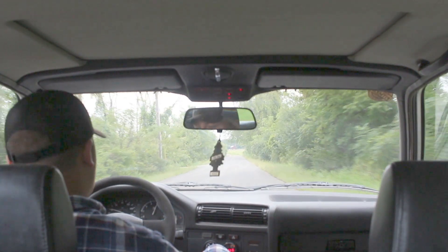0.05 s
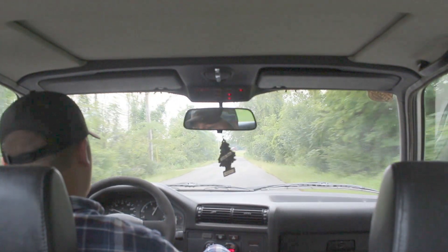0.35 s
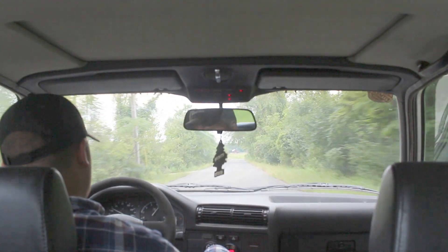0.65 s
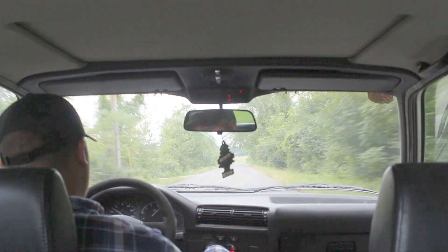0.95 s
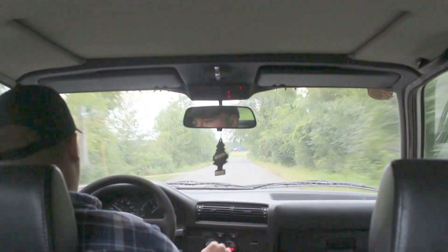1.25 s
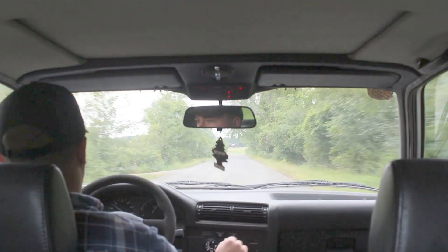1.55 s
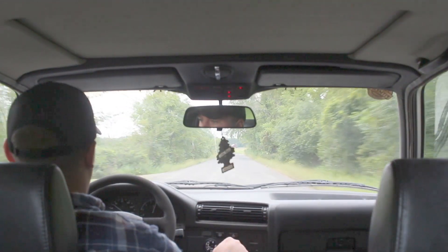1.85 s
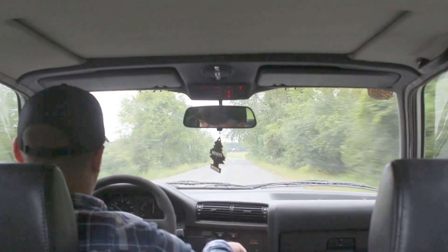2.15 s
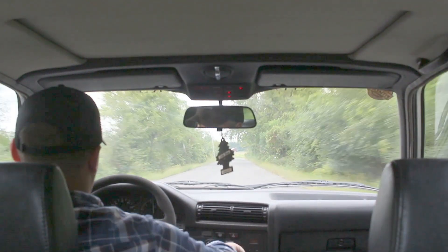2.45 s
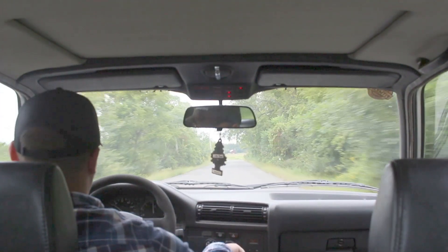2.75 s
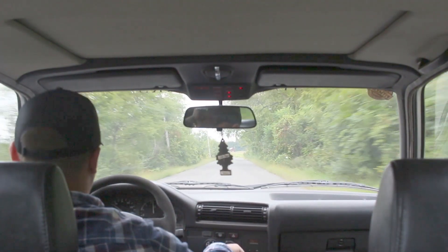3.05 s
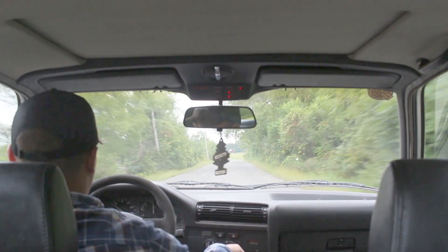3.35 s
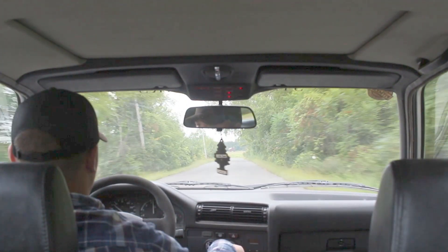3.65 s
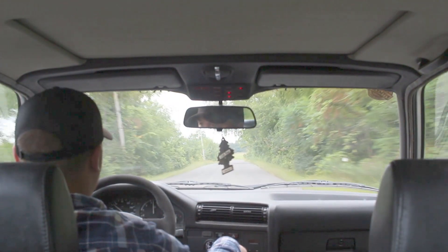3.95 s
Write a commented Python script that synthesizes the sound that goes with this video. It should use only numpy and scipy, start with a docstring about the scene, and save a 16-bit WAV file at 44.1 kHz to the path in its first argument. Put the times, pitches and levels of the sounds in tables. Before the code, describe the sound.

A turbocharged car engine pulls upward in pitch for the first second, with a faint rising whistle, heard from the back seat over tyre rumble. At about 1.2 seconds the throttle lifts: the revs fall, the exhaust burbles and the turbo flutters in rapid airy chuffs until 2.4. Dull gear change knocks land around 1.3 and 1.8. From 2.3 the engine drones lower and steadily to the end at 4.

```python
"""Inside a turbocharged six-cylinder car on a country road. Over the broadband rumble of the tyres,
periodic firing sounds a harmonic series that climbs as the engine pulls and the turbo whistles up.
The throttle lifts for a gear change: trapped boost surges back through the compressor in chuffs,
the drivetrain knocks, and uneven firings ring the exhaust. Then the engine drones on in the next gear."""
import sys
import numpy as np
from scipy import signal
from scipy.fft import rfft, irfft
from scipy.io import wavfile
from scipy.ndimage import uniform_filter1d

SR = 44100
rng = np.random.default_rng(int(sys.argv[2]) if len(sys.argv) > 2 else 0)


def int16_out(signal):
    """Quantize to a 16-bit WAV file."""
    q = np.round(np.clip(np.atleast_2d(signal).T, -1, 1) * 32767)
    wavfile.write(sys.argv[1], SR, q.astype(np.int16))


N = 176400
T = np.arange(N) / SR


def amp(db):
    """The decibel scale: level to amplitude ratio."""
    return 10 ** (np.asarray(db) / 20)


def unit(x):
    """Normalisation to rms 1."""
    return x / np.sqrt(np.mean(x ** 2) + 1e-20)


def curve(points):
    """Linear interpolation of (time [s], value) points."""
    return np.interp(T, *np.transpose(points))


def swell(at_s, width_s):
    """A Gaussian envelope of peak 1."""
    return np.exp(-((T - at_s) / width_s) ** 2)


def drift(hz):
    """Random modulation: noise of rms 1, low-passed at hz."""
    f = np.fft.rfftfreq(N, 1 / SR)
    return unit(irfft(rfft(rng.standard_normal(N)) / (1 + (f / hz) ** 4), N))


def noise(spectrum, tilt=lambda f: 1):
    """Spectral shaping: noise of rms 1 from (frequency [Hz], relative level [dB]) points."""
    f = np.fft.rfftfreq(N, 1 / SR) + 1
    hz, db = np.transpose(spectrum)
    gain = amp(np.interp(np.log(f), np.log(hz), db)) * tilt(f)
    return unit(irfft(rfft(rng.standard_normal(N)) * gain, N))


def resonate(x, hz, half_width_hz):
    """Resonance: a double pole follows hz, 6 dB down at half_width_hz to either side; rms 1."""
    carrier = np.exp(2j * np.pi * np.cumsum(hz * np.ones(N)) / SR)
    pole = np.exp(-2 * np.pi * half_width_hz / SR)
    return unit((carrier * signal.lfilter([1], [1, -2 * pole, pole * pole], x / carrier)).real)


def noise_band(hz, half_width_hz):
    """Random excitation of a resonance gives a fuzzy tone of rms 1."""
    return resonate(rng.standard_normal(N), hz, half_width_hz)


# tyres, wind and running gear (frequency [Hz], relative level [dB])
ROAD_SPECTRUM = [(15, -24), (31, -1), (45, -9.5), (70, 3.5), (120, 1), (200, 1.5), (290, -4), (380, -4.5),
                 (470, -13.5), (580, -16), (760, -13.5), (1000, -20), (1300, -26), (1650, -27.5),
                 (2300, -35.5), (3100, -35.5), (4000, -37.5), (4500, -43.5), (5600, -49), (6700, -52.5),
                 (7500, -57), (10000, -63.5), (16000, -72.5)]
# road noise below the crossover (time [s], level [dB])
RUMBLE_LEVEL = [(0, -24.5), (.75, -29.5), (1.1, -19), (1.32, -18), (1.5, -19), (1.95, -21), (2.3, -19.5),
                (3.3, -20.5), (4, -23.5)]
# road noise above the crossover (time [s], level [dB])
HISS_LEVEL = [(0, -40.5), (.2, -37.5), (1, -38.5), (1.6, -35), (1.9, -39.5), (2.3, -35), (2.8, -37),
              (3.1, -34.5), (3.38, -33), (3.65, -37), (4, -39)]
# modes of the engine bay and body (frequency [Hz], half-width [Hz], relative level [dB])
BODY_MODES = [(3635, 55, -61), (3800, 250, -64), (3948, 38, -62.5), (4830, 160, -71)]

def road(crossover_hz=483, lumps_db=1, flicker_db=.57, intake_coupling_db=41.5):
    """Broadband noise and forced vibration: tyres rumble and hiss; hiss and intake air ring the body."""
    rumble = noise(ROAD_SPECTRUM, lambda f: 1 / np.sqrt(1 + (f / crossover_hz) ** 8))
    hiss = noise(ROAD_SPECTRUM, lambda f: 1 / np.sqrt(1 + (crossover_hz / f) ** 8))
    hiss_gain = amp(curve(HISS_LEVEL) + flicker_db * drift(39))
    modes = sum(amp(db) * noise_band(hz, half_width) for hz, half_width, db in BODY_MODES)
    drive = np.hypot(unit(hiss_gain), amp(curve(INTAKE_LEVEL) + intake_coupling_db))  # powers add
    rumble_gain = amp(curve(RUMBLE_LEVEL) + lumps_db * drift(6.8))
    return rumble_gain * rumble + hiss_gain * hiss + drive * modes


def gearbox(firing_multiple=29.3, level_db=-69.5, waver_db=2, fade_in_s=(1.8, 3.1)):
    """Order tracking: a thin whine follows engine speed in the next gear; a faint peep sounds once."""
    whine_gain = amp(level_db + waver_db * drift(4.4)) * np.interp(T, fade_in_s, [0, 1])
    whine = whine_gain * noise_band(firing_multiple * curve(FIRING_RATE), half_width_hz=70)
    peep = amp(level_db) * swell(at_s=2.81, width_s=.12) * noise_band(hz=6600, half_width_hz=220)
    return whine + peep


# drivetrain knocks and exhaust pops (time [s], envelope peak [dB], frequency [Hz])
THUMP_EVENTS = [(1.147, -13, 206), (1.179, -10.5, 374), (1.307, -5.5, 100), (1.34, -6.5, 205),
                (1.799, -4.5, 204.1), (1.963, -15.5, 242)]
# light rattles of the trim (time [s], level [dB])
TRIM_HITS = [(.137, -57), (.162, -57), (.34, -60), (0.444, -54)]
# dull clunks of the gear lever (time [s], level [dB])
LEVER_HITS = [(1.184, -27), (1.815, -30)]
# spectra of the trim and the lever (frequency [Hz], relative level [dB])
TRIM_SPECTRUM = [(1000, 3), (3500, -0.5), (6700, 1), (9000, -15), (16000, -24)]
LEVER_SPECTRUM = [(300, -12), (780, 3), (1100, -12), (1600, -14), (3000, -32), (16000, -80)]

def knocks(thump_s=.003):
    """Damped transients: thumps decay as sinusoids, trim rattles and lever clunks as noise."""
    rattle, clunk = noise(TRIM_SPECTRUM), noise(LEVER_SPECTRUM)
    out = np.zeros(N)
    for s, db, hz in THUMP_EVENTS:
        age = np.maximum(T - s, 0)
        out += amp(db) * age / thump_s * np.exp(1 - age / thump_s) * np.sin(2 * np.pi * hz * age)
    out += rattle * impacts(TRIM_HITS, rise_s=.001, decay_s=.018)
    return out + clunk * impacts(LEVER_HITS, rise_s=.008, decay_s=.022)


def impacts(hits, rise_s, decay_s):
    """Exponential decay after a linear rise: the envelope of a series of hits."""
    return sum(amp(db) * np.clip((T - s) / rise_s, 0, 1) * np.exp(-abs(T - s) / decay_s)
               for s, db in hits)


def cabin(x, decay_s=.008, echo_gain=.42):
    """Interference: dense early reflections off glass and trim give the treble a hollow colour."""
    t = T[:SR // 10]
    echoes = rng.standard_normal(len(t)) * np.exp(-t / decay_s)
    echoes = signal.sosfilt(signal.butter(2, 1000, "high", fs=SR, output="sos"), echoes)
    reflected = signal.fftconvolve(x, echoes / np.linalg.norm(echoes))[:N]
    return (x + echo_gain * reflected) / np.hypot(1, echo_gain)


# pulses of back flow through the compressor (time [s], level [dB])
SURGE_PULSES = [(1.217, -54), (1.285, -44.5), (1.355, -47.5), (1.428, -49), (1.494, -50), (1.563, -47.5),
                (1.631, -50), (1.699, -51), (1.764, -48.5), (1.827, -53), (1.887, -50), (1.945, -50.5),
                (2.006, -50), (2.065, -52), (2.126, -50), (2.19, -50.5), (2.248, -50.5), (2.314, -57),
                (2.375, -67)]

def surge(rise_s=.015, fall_s=.022, shrink_per_s=.25):
    """Compressor surge: the envelope of the back flow, whose pulses shorten as the boost drains."""
    stretch = np.exp(-shrink_per_s * (T - SURGE_PULSES[0][0]))
    return sum(amp(db) * swell(s, stretch * np.where(T < s, rise_s, fall_s)) for s, db in SURGE_PULSES)


# spectra of every chuff and of the bright spit (frequency [Hz], relative level [dB])
CHUFF_SPECTRUM = [(500, -18), (1500, -5), (3700, 19), (5500, 7.5), (7200, -6.5), (8400, -4), (9500, -5.5),
                  (12000, -3), (14300, -10), (15200, -20)]
SPIT_SPECTRUM = [(5000, -29), (9000, -4), (11000, 2), (14200, 4), (15000, -2)]

def flutter(grain_db=2.5, spit_fade_s=(1.5, 1.9), chirp_growth_s=(1, 2.2)):
    """Pulsed flow noise: trapped boost escapes in chuffs; the first ones spit, the last ones chirp."""
    spit = amp(-14) * np.interp(T, spit_fade_s, [1, 0]) * noise(SPIT_SPECTRUM)
    chirp = amp(-16) * np.interp(T, chirp_growth_s, [0, 1]) * noise_band(hz=8400, half_width_hz=400)
    return surge() * amp(grain_db * drift(300)) * (noise(CHUFF_SPECTRUM) + spit + chirp)


# compressor whistle (time [s], frequency [Hz], level [dB])
WHISTLE_PATH = [(0, 5180, -70), (0.2, 5620, -68), (.4, 6430, -68), (.6, 7400, -69), (.8, 8700, -67),
                (1, 9500, -66), (1.17, 9750, -66.5), (1.3, 9150, -65), (1.5, 8090, -66), (1.72, 7050, -75),
                (1.95, 6200, -73), (2.15, 5630, -67), (2.4, 5050, -66.5), (2.8, 4400, -71.5),
                (3.08, 3980, -63), (3.5, 3720, -62.5), (4, 3490, -72)]
# air rushing through the intake (time [s], level [dB])
INTAKE_LEVEL = [(0, -59), (.6, -48.5), (.85, -47), (1.05, -40.5), (1.22, -37), (1.4, -41.5), (1.58, -42.5),
                (1.75, -46), (1.95, -50), (4, -64.5)]
# spectrum of that air (frequency [Hz], relative level [dB])
INTAKE_SPECTRUM = [(100, -20), (400, 2.5), (750, 1), (1100, 0), (1600, -9.5), (2400, -12), (3700, -10.5),
                   (5000, -17.5), (7400, -24.5), (9500, -29), (14000, -39.5), (16000, -43)]

def turbo(flicker_db=1, waver_db=3.5, chop_db=6):
    """Aerodynamic sound: the compressor's whistle, chopped by surge, and the rush of the air it draws."""
    times, hz, db = np.transpose(WHISTLE_PATH)
    pitch = np.interp(T, times, hz)
    backflow = surge()
    mean_flow = uniform_filter1d(backflow, size=3000)
    chop = (backflow - mean_flow) / (mean_flow + amp(-66))
    whistle_db = np.interp(T, times, db) - waver_db * drift(25) + chop_db * chop
    whistle = amp(whistle_db) * noise_band(pitch, half_width_hz=135)
    halo = amp(-29) * noise_band(pitch, half_width_hz=900)  # an airy band around the whistle
    intake_gain = amp(curve(INTAKE_LEVEL) + flicker_db * drift(60))
    return whistle + intake_gain * (noise(INTAKE_SPECTRUM) + halo)


# hoarse rasp of the engine (frequency [Hz], relative level [dB])
RASP_SPECTRUM = [(500, -9), (1000, -5), (1600, 6.5), (2100, -5), (2800, -7), (5000, -21.5), (16000, -38.5)]

def rasp(level_db=-43, depth=.63):
    """Amplitude modulation: noise puffs once per firing and swells near the top of the revs."""
    puffs = 1 + depth * np.cos(2 * np.pi * np.cumsum(curve(FIRING_RATE)) / SR)
    return amp(level_db) * swell(at_s=.988, width_s=.23) * puffs * noise(RASP_SPECTRUM)


# resonances of the exhaust (frequency [Hz], level [dB])
EXHAUST_MODES = [(380, -27.5), (503, -37.5), (632, -35), (757, -33.5)]

def bark():
    """Modal resonance: the exhaust rings roughly for a moment as the throttle shuts."""
    modes = sum(amp(db) * noise_band(hz, half_width_hz=25) for hz, db in EXHAUST_MODES)
    return swell(at_s=1.2, width_s=.1) * modes


# rough exhaust note, loudest off the throttle (time [s], level [dB])
BURBLE_LEVEL = [(0, -56), (.9, -39.5), (1.15, -43), (1.35, -25.5), (1.65, -18), (1.9, -30.5), (2.15, -27.5),
                (2.4, -23), (4, -42)]

def burble(spread_db=3.5):
    """Impulse excitation: firings of uneven strength and random sign ring the exhaust."""
    firings = np.diff(np.floor(np.cumsum(curve(FIRING_RATE)) / SR), prepend=0)
    strengths = amp(spread_db * np.clip(rng.standard_normal(N), -2, 2))
    signs = np.sign(rng.standard_normal(N))
    return amp(curve(BURBLE_LEVEL)) * resonate(firings * strengths * signs, hz=230, half_width_hz=75.5)


# engine speed (time [s], firing rate [Hz])
FIRING_RATE = [(0, 200.5), (.25, 214.1), (.5, 225.5), (.75, 236), (1, 248.7), (1.1, 252.2), (1.29, 250.8),
               (1.5, 229), (1.75, 203.9), (2, 183.3), (2.2, 164.7), (2.5, 166.1), (3, 167.6), (3.5, 169.8),
               (4, 170.5)]
# boom of the firing note in the cabin (time [s], level [dB])
BOOM_LEVEL = [(0, -13.5), (.35, -15.5), (.52, -13), (.8, -16), (.95, -21.5), (1.08, -35), (1.25, -23.5),
              (1.38, -17), (1.46, -21), (1.62, -14.5), (1.85, -21), (2.16, -30), (2.26, -14.5), (2.8, -17),
              (3.3, -16.5), (3.8, -13), (4, -13.5)]
# engine load, added to the level of every order (time [s], gain [dB])
LOAD_GAIN = [(0, -5.5), (.5, -2), (1, 2), (1.08, -3.5), (1.17, -4.5), (1.35, -12), (2.1, -6), (2.3, -6),
             (2.9, -4.5), (3.3, 1), (4, -0.5)]
# engine orders before the load gain (multiple of the cycle rate [rounded when played],
# level early in the pull [dB], level at high revs [dB], level in the next gear [dB])
ENGINE_ORDERS = [(1, -38, -43.5, -41), (2, -28, -28.5, -39.5), (3, -30.5, -41, -35.5), (4, -28.5, -30, -45),
                 (5, -26, -33, -31), (7, -22.5, -29.5, -35), (8, -43.5, -40.5, -28), (9, -28, -40.5, -30.5),
                 (9.9, -37.5, -46.5, -28), (11, -44.5, -36.5, -33), (12, -36.5, -27.5, -33),
                 (13, -55, -41, -41.5), (15, -43, -40, -42.5), (16, -50, -39, -45.5), (17, -36.5, -53, -45),
                 (18, -42, -40.5, -43), (20, -40, -49.5, -52.5), (21, -40, -55.5, -59),
                 (23, -46.5, -42.5, -61.5), (24, -47, -41, -66.5), (27, -56.5, -48, -50.5),
                 (30, -65.5, -49, -62)]

def engine(cylinders=6, jitter=.002, rev_up_s=(.46, 1), shift_s=(1.3, 2.06)):
    """Harmonic series: the firing note, and orders of the cycle rate that unequal cylinders add."""
    firing_phase = 2 * np.pi * np.cumsum(curve(FIRING_RATE) * (1 + jitter * drift(16))) / SR
    throb = .04 + .5 * swell(at_s=1.65, width_s=.4)  # the note stumbles off the throttle
    stumble = throb * drift(27) * np.sin(firing_phase + drift(23))
    out = amp(curve(BOOM_LEVEL)) * (np.sin(firing_phase) + stumble) / np.hypot(1, throb)
    revved, shifted = np.interp(T, rev_up_s, [0, 1]), np.interp(T, shift_s, [0, 1])
    load_db = curve(LOAD_GAIN)
    slack = np.clip(1 - amp(load_db), 0, 1)
    unsteady = .12 + .7 * np.maximum(slack, shifted / 2)  # rougher at light load and after the shift
    for order, early_db, high_db, next_db in ENGINE_ORDERS:
        pull_db = early_db * (1 - revved) + high_db * revved
        db = pull_db * (1 - shifted) + next_db * shifted + load_db
        blur = .007 * max(order - cylinders, 0)  # high orders wobble more
        wobble = (1 + (unsteady + blur) * (drift(9.4) + 1j * drift(8.9))) / np.hypot(1, blur)
        harmonic = round(order)
        # the firing note's neighbours get no phase offset, so they beat with it once a cycle
        offset = 2 * np.pi * rng.random() * (abs(harmonic - cylinders) > 1)
        out += amp(db) * (wobble * np.exp(1j * (harmonic * firing_phase / cylinders + offset))).imag
    return np.sqrt(2) * out


def scene():
    """Superposition: all sources add at the back seat, the turbo and its flutter with reflections."""
    engine_and_exhaust = engine() + rasp() + bark() + burble()
    return (engine_and_exhaust + cabin(turbo() + flutter()) + gearbox() + road() + knocks())[None]


def record(dry):
    """Band limiting: a steep low-pass filter removes the highest treble."""
    lowpass = signal.firwin(511, cutoff=15750, window=("kaiser", 9), fs=SR)
    return signal.oaconvolve(dry, lowpass[None], "same")


dry = scene()
out = record(dry)
int16_out(out)
```